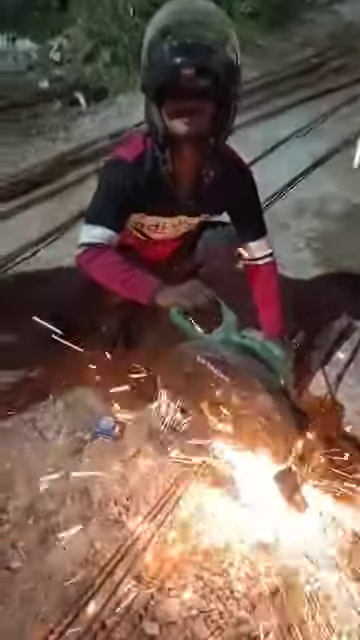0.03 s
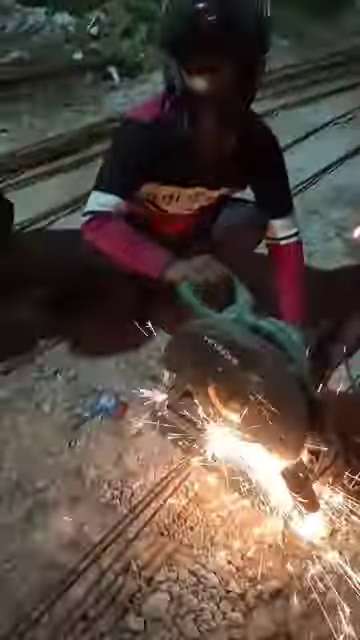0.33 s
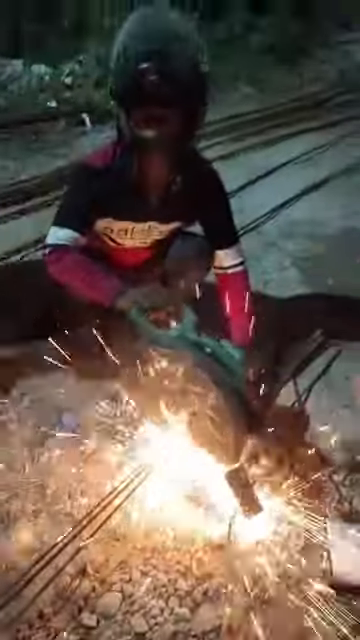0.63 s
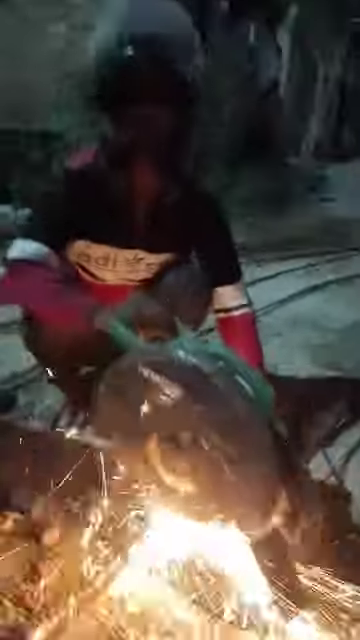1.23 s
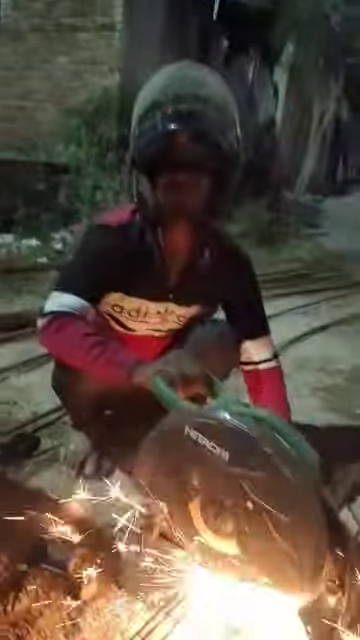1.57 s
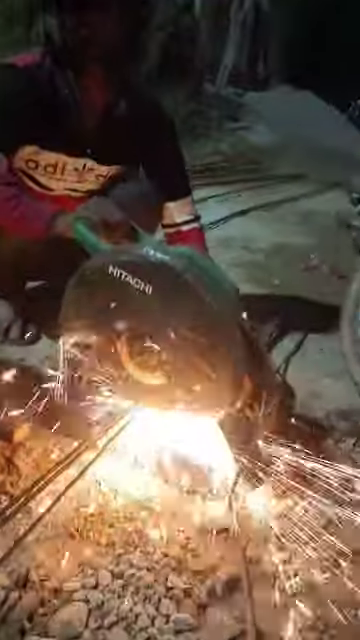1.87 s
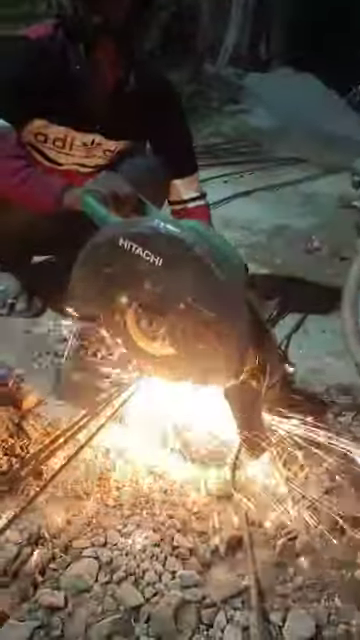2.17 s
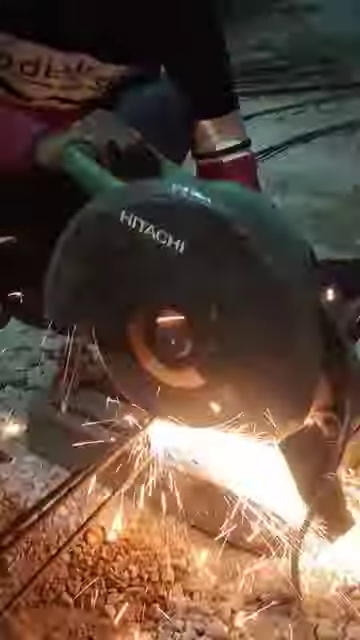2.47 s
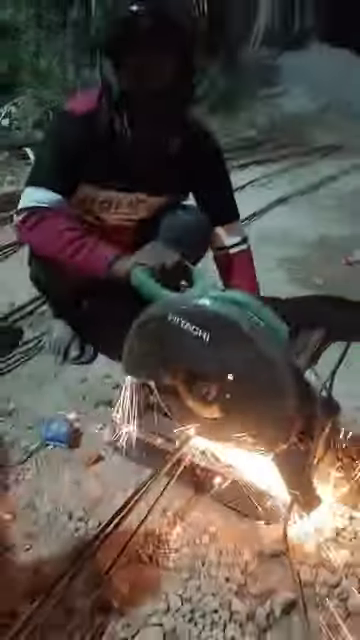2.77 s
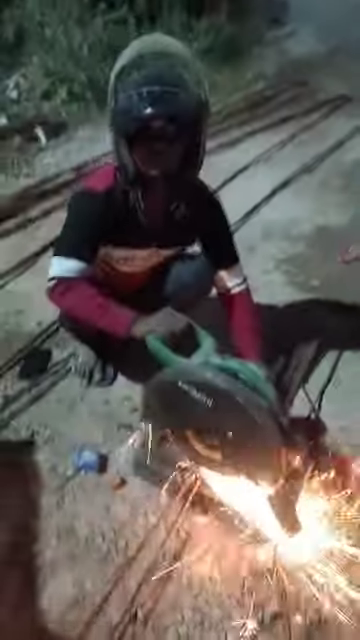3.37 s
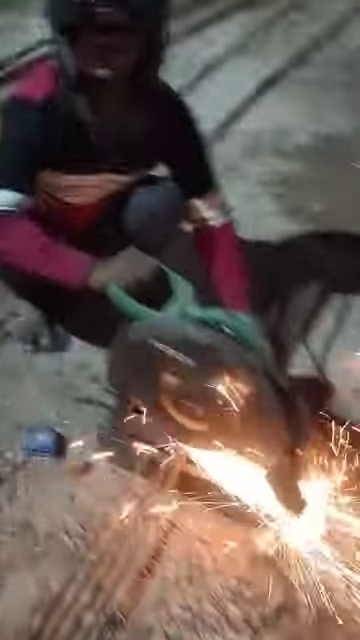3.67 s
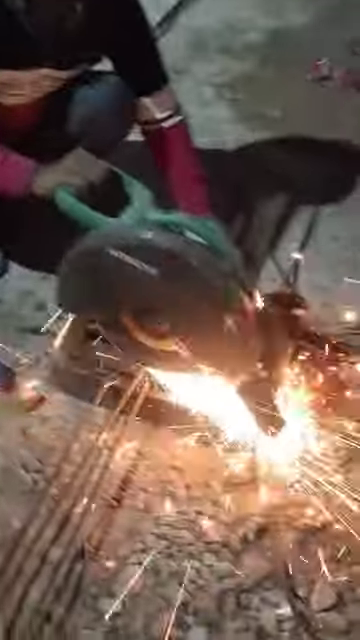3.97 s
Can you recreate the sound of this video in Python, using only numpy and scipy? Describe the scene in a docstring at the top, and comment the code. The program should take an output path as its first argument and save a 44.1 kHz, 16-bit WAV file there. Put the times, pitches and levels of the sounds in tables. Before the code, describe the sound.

Outdoors, a close cut-off saw bites into steel rods with a harsh rasp, metallic ringing and fizzing sparks. Air from the wheel rumbles on the microphone's left side, then the grinding lightens and the motor's whine comes forward.

```python
"""Outdoors, close by, an abrasive cut-off saw grinds through steel rods.
The wheel's grit scrapes the steel once a turn, the rods ring in one mode after another,
sparks tick, the wheel squeals and the geared motor whines. During the deep cut, air thrown off
the wheel buffets the left microphone port; the cut then eases to light skimming.
Twice the sound drops out briefly."""
import sys
import numpy as np
from scipy import signal
from scipy.fft import rfft, irfft, next_fast_len
from scipy.io import wavfile
from scipy.ndimage import uniform_filter1d, map_coordinates

SR = 44100
rng = np.random.default_rng(int(sys.argv[2]) if len(sys.argv) > 2 else 0)


def bounce(signal):
    """Save signal as a 16-bit WAV file at the path given by the first command-line argument."""
    frames = np.transpose(np.atleast_2d(signal))
    limited = np.clip(frames, -1, 1)
    pcm = np.round(limited * 32767).astype(np.int16)
    wavfile.write(sys.argv[1], SR, pcm)


N = 176400


def amp(db):
    """Decibels to gain."""
    return 10 ** (np.asarray(db) / 20)


def unit(x):
    """Scale to rms 1; a pair is scaled by its mid signal."""
    return x / np.sqrt(np.mean(np.atleast_2d(x).mean(0) ** 2) + 1e-20)


def along(points, hz):
    """Interpolate (Hz, value) points on a log axis."""
    knots_hz, values = np.transpose(points)
    return np.interp(np.log(hz + 1), np.log(knots_hz + 1), values)


def curves(rows):
    """One value per sample for each column after the time."""
    times_s, *columns = np.transpose(rows)
    return [np.interp(np.arange(N) / SR, times_s, column) for column in columns]


def wobble(knots_per_s):
    """Smooth random curve."""
    knots = rng.standard_normal(int(N * knots_per_s / SR) + 4)
    return map_coordinates(knots, [np.arange(N) * knots_per_s / SR])


def filtered(x, response):
    """Apply a frequency response."""
    size = next_fast_len(N + SR // 4)
    return irfft(rfft(x, size) * response(np.fft.rfftfreq(size, 1 / SR)), size)[..., :N]


def blend(a, b, share):
    """Equal-power mix with the given share of b."""
    share = np.clip(share, 0, 1)
    return np.sqrt(1 - share) * a + np.sqrt(share) * b


def panned(pair, pan_db):
    """Constant-power pan; pan_db is left minus right."""
    gains = amp(np.array([pan_db, -pan_db]) / 2).reshape(2, -1)
    return pair * gains / np.sqrt(np.mean(gains ** 2, 0))


LEFT_LEAD_S = .0001

def left_early(x):
    """Sound reaches the nearer, left port first."""
    return filtered(x, lambda hz: np.exp(1j * np.pi * LEFT_LEAD_S * np.outer([1, -1], hz)))


# Each row: frequency in Hz, left-right correlation.
PORT_CORRELATION = [(100, 0.75), (500, 0.84), (1200, 0.61), (2700, 0.26), (5000, 0.1), (12000, 0.13)]

def at_ports(pair):
    """Make two unrelated signals partly alike, the left a little early."""
    def mid_side_gains(hz):
        angle = np.arccos(np.clip(along(PORT_CORRELATION, hz), -1, 1)) / 2
        return np.array([np.cos(angle), np.sin(angle)])

    mid, side = filtered(pair, mid_side_gains)
    return left_early(np.array([mid + side, mid - side]))


# Each row: time in seconds, wheel speed in turns per second.
WHEEL_SPEED = [(0, 49.9), (.25, 51.2), (1, 52), (1.75, 49.8), (2.2, 50.7), (2.78, 53.55), (3.25, 54.42),
               (3.55, 54.72), (4, 55.2)]

def wheel_turns():
    """Running count of the wheel's turns."""
    return np.cumsum(curves(WHEEL_SPEED)[0]) / SR


# Each row: time in seconds, share of the scraping that repeats from turn to turn.
REPEAT_SHARE = [(0, 0.6), (.26, 0.7), (.38, 0.1), (2.6, 0.05), (2.8, 0.4), (4, 0.47)]

def scraping(turns, wear_turns, grains_per_turn=800):
    """The rim's grit comes round each turn and slowly wears; fresh fracture noise joins it."""
    grit = rng.standard_normal((2, 300, grains_per_turn))
    worn = signal.lfilter([1], [1, -np.exp(-1 / wear_turns)], grit, axis=1).reshape(2, -1)
    position = (turns + 40) * grains_per_turn  # 40 turns of run-in
    repeating = np.array([map_coordinates(rim, [position]) for rim in worn])
    fracture = rng.standard_normal((2, N))
    return at_ports(blend(unit(fracture), unit(repeating), curves(REPEAT_SHARE)[0]))


def wandering_contact(pair, patchy_db):
    """The contact point wanders, so narrow bands swell and fade at random."""
    spectrum = signal.stft(pair, nperseg=1024)[2]
    patches = rng.standard_normal(spectrum.shape[1:])
    for _ in range(2):
        patches = uniform_filter1d(patches, size=3, axis=0)
        patches = uniform_filter1d(patches, size=14, axis=1)
    spectrum *= amp(patchy_db * patches / patches.std())
    return unit(signal.istft(spectrum, nperseg=1024)[1][:, :N])


def runout(turns, depth, spot_turns, focus=1.5):
    """Gain of a wheel slightly out of true: it presses harder once a turn, at its heavy spot."""
    pressure = np.exp(focus * (np.cos(2 * np.pi * (turns - spot_turns)) - 1))
    gain = amp(depth * curves(REPEAT_SHARE)[0] * (pressure - pressure.mean()))
    return gain / np.sqrt(uniform_filter1d(gain ** 2, size=SR // 8))


# Each row: time in seconds, share of light skimming against deep cutting.
SKIM_SHARE = [(0, 0), (2.55, 0.34), (2.8, 0.99), (4, 1)]
# Each row: frequency in Hz, relative gain in dB.
DEEP_SPECTRUM = [(150, -21.5), (350, -18), (470, -9), (610, 0), (760, -10), (890, -7), (1020, -6),
                 (1130, -6), (1230, -13), (1370, -8), (1500, -12), (1880, -15.5), (2150, -13),
                 (2420, -14.5), (2700, -4.5), (3150, -2.5), (3450, -7.5), (3850, -8.5), (4250, -6),
                 (4500, -14), (4750, -10.5), (5100, -12), (5450, -3), (5800, -6.5), (6080, -10.5),
                 (6900, -10), (7700, -12), (8500, -8.5), (10200, -18), (12300, -30), (15400, -33.5)]
SKIM_SPECTRUM = [(60, -28), (150, -27), (250, -21), (380, -22), (460, -22), (580, -9.5), (700, -5.5),
                 (810, -6), (930, -2.5), (1050, -12), (1210, 2), (1500, -15.5), (1630, -17), (1820, -21.5),
                 (2250, 1.5), (2640, -0.5), (3100, -6), (3450, -5.5), (3750, -5.5), (4100, -17.5),
                 (4600, -8.5), (5000, -15), (5750, -10.5), (6200, -15.5), (7000, -12.5), (7600, -17),
                 (8500, -15.5), (9400, -19), (12000, -16), (15400, -27.5)]
# Five bands, low to high. Each row: time in seconds, relative level in dB, pan in dB.
ROAR_BAND = [(0.0, -30, 0.5), (0.72, -32, 2), (0.84, -31.5, 2.5), (1.44, -37, 2.5), (1.56, -32.5, 3),
             (1.62, -38, 1.9), (1.86, -35, -1), (1.92, -38, 0), (2.16, -36.5, 1), (2.22, -42, 2),
             (2.64, -38, 0), (3.36, -36.5, 1), (3.99, -35, 0.5)]
RASP_BAND = [(0.0, -19.5, 12), (0.36, -24, 3.8), (0.84, -21.5, 7.1), (0.9, -27, 4), (0.96, -22, 4.5),
             (1.08, -24, 1.85), (1.32, -33, 4.3), (1.44, -39.5, 1.2), (1.63, -43, 3.3), (1.74, -28.5, 8.7),
             (1.83, -41.5, 4.8), (2.04, -27.5, 7), (2.16, -26.5, 7), (2.22, -31.5, 10), (2.28, -24.5, 7.3),
             (2.4, -25, 6.9), (2.52, -31, 7.5), (2.58, -25.5, 8.3), (2.82, -25, 12), (2.88, -24, 7.1),
             (3.36, -26.5, 7), (3.48, -26.5, 9.2), (3.99, -21.5, 14)]
SIZZLE_BAND = [(0.0, -24, 7.7), (0.66, -27, 3.4), (1.02, -25.5, 4.0), (1.38, -31, 6.7), (1.62, -34, 5),
               (1.72, -25, 9.2), (1.86, -36.5, 7.8), (2.1, -30.1, 4), (2.16, -28, 6.8), (2.4, -25.5, 10),
               (2.46, -34, 11), (2.52, -30, 7.5), (2.82, -29, 9.9), (3.24, -30, 10.5), (3.48, -33.5, 9.2),
               (3.72, -31, 9.3), (3.99, -31.5, 6.5)]
HISS_BAND = [(0.0, -32, -5.5), (0.84, -31.5, -3), (1.14, -33, -8), (1.44, -41, -11), (1.8, -38, -7),
             (2.22, -33, -5), (2.46, -35.5, -7), (2.58, -32, -14), (2.7, -42, -4), (2.88, -46.5, -5),
             (3.36, -35.5, -3), (3.72, -40.5, -2), (3.99, -40, -4)]
FIZZ_BAND = [(0, -36, 10), (.3, -32, 4), (.6, -33, 3), (1.26, -38.5, 2), (1.4, -46, 2), (2.58, -42, 8),
             (2.66, -48, 10), (2.76, -39.5, 8), (3.06, -42, 5), (4, -41, 10)]

def grinding(turns, scrape):
    """Scraping coloured by wheel, guard and steel; the contact pressure chatters."""
    def jolts():
        return wobble(70) + 1.05 * wobble(21.94) + 0.29 * wobble(260)

    skim, = curves(SKIM_SHARE)
    shared_jolts = jolts()

    def band(rows, press, lo_hz, hi_hz, gain_db, chatter_db):
        def coloured(spectrum):
            edges = lambda hz: 1 / np.sqrt((1 + (lo_hz / (hz + 1)) ** 20) * (1 + (hz / hi_hz) ** 20))
            return unit(filtered(scrape, lambda hz: edges(hz) * amp(along(spectrum, hz))))

        level_db, pan_db = curves(rows)
        cut = blend(coloured(DEEP_SPECTRUM), coloured(SKIM_SPECTRUM), skim)
        chatter = unit(amp(chatter_db * blend(jolts(), shared_jolts, share=0.37)))
        return panned(cut, pan_db) * amp(level_db + gain_db) * chatter * press

    low_press = runout(turns, depth=4, spot_turns=0.62)
    high_press = runout(turns, depth=0.5, spot_turns=0.42)
    return (band(ROAR_BAND, low_press, lo_hz=74, hi_hz=1890, gain_db=3, chatter_db=1.2)
            + band(RASP_BAND, high_press, lo_hz=1770, hi_hz=3196, gain_db=-3.5, chatter_db=0.53)
            + band(SIZZLE_BAND, high_press, lo_hz=4030, hi_hz=6360, gain_db=-3, chatter_db=0.85)
            + band(HISS_BAND, high_press, lo_hz=7760, hi_hz=10200, gain_db=-3, chatter_db=1.24)
            + band(FIZZ_BAND, high_press, lo_hz=12540, hi_hz=19400, gain_db=-0.5, chatter_db=1.5))


# Each row: start in seconds, end in seconds, pitch in Hz, width in Hz, relative level in dB.
ROD_MODES = [(0, .3, 2930, 70, -30), (0, .3, 3180, 50, -31), (0, .2, 2720, 60, -31),
             (0, .25, 4270, 45, -36), (.68, 1.1, 2930, 60, -26.5), (.95, 1.27, 1135, 35, -37),
             (1.05, 1.38, 2740, 50, -32), (1.12, 1.45, 570, 50, -31), (1.28, 1.46, 2190, 50, -41),
             (1.35, 1.78, 3780, 90, -42), (1.38, 2.05, 4730, 100, -42), (1.6, 1.8, 4190, 35, -35.5),
             (1.57, 1.82, 2090, 45, -40), (1.65, 2.16, 553, 52, -28), (1.65, 1.82, 1148, 25, -34.5),
             (1.67, 1.78, 2720, 70, -34), (1.68, 1.85, 1745, 35, -38), (1.82, 2.05, 1330, 70, -39),
             (1.9, 2.42, 3110, 70, -35), (1.99, 2.19, 2730, 50, -31), (2.1, 2.3, 1110, 30, -37),
             (2.3, 2.56, 4350, 90, -37), (2.64, 3.02, 1506, 34, -36), (2.72, 3, 1607, 28, -37.5),
             (2.85, 3.65, 2520, 110, -31), (2.85, 3.15, 3030, 40, -33), (2.96, 3.32, 1138, 26, -28.5),
             (3.42, 3.85, 2690, 70, -29.5), (3.76, 4.1, 2990, 130, -29)]
# Low modes lock into a tone, high ones stay rough. Each row: pitch in Hz, share of pure tone.
MODE_PURITY = [(1600, .84), (2700, .25)]
# High modes radiate more to the left. Each row: pitch in Hz, pan in dB.
MODE_PAN = [(1400, 2.5), (2700, 12.5)]

def ringing_rods(turns, scrape, hold_s=0.015, fade_s=0.13, flutter_db=2.5, gain_db=1):
    """Friction drives mode after mode to a steady ring that pulses once and flutters twice a turn."""
    t, out = np.arange(N) / SR, np.zeros((2, N))
    drive = scrape * runout(turns, depth=6, spot_turns=0.41)
    flutter = amp(flutter_db * np.cos(2 * np.pi * 2 * turns))
    pulsing = runout(turns, depth=6, spot_turns=0.58) * flutter
    for start_s, end_s, hz, width_hz, level_db in ROD_MODES:
        gate = np.clip(np.minimum(t - start_s, end_s - t) / fade_s + .5, 0, 1)
        rough = signal.lfilter(*signal.iirpeak(hz, hz / width_hz, SR), drive)
        rough = signal.lfilter(*signal.iirpeak(hz, hz / (width_hz * 4), SR), rough)
        power = uniform_filter1d(np.mean(rough ** 2, 0), size=int(hold_s * SR))
        steady = rough / np.sqrt(np.abs(power) + 1e-12)
        phase = 2 * np.pi * np.cumsum(hz + 0.3008 * width_hz * wobble(40)) / SR
        tone = np.sqrt(2) * np.sin(phase + np.pi * hz * LEFT_LEAD_S * np.array([[1], [-1]]))
        ring = blend(steady, tone, along(MODE_PURITY, hz)) * pulsing
        out += unit(panned(ring, along(MODE_PAN, hz))) * gate * amp(level_db + gain_db)
    return out


def sparks(level_db, per_s=110, decay_s=.0012, spread_db=2):
    """Hot chips burst off the cut in tiny bright ticks; their level follows the hiss band."""
    onsets = rng.random(N) < per_s / SR
    bursts = onsets * amp(spread_db * np.clip(rng.standard_normal(N), -2, 2))
    envelope = signal.lfilter([1], [1, -np.exp(-1 / (decay_s * SR))], bursts)
    ticks = envelope * rng.standard_normal((2, N))
    bright = signal.sosfilt(signal.butter(2, 7500, 'high', fs=SR, output='sos'), ticks)
    hiss_db = curves(HISS_BAND)[0]
    return unit(bright) * amp(level_db + hiss_db - hiss_db[0])


# Each row: time in seconds, upper mode's pitch in Hz, relative levels of upper and lower mode in dB.
SQUEAL_MODES = [(0, 5720, -35, -39), (.4, 5700, -48, -48), (1.3, 5680, -42, -42), (1.5, 5560, -29, -46),
                (1.61, 5560, -43, -52), (1.68, 5690, -29.5, -50), (1.8, 5750, -36, -54),
                (1.97, 5840, -34, -52), (2.2, 5850, -46, -46), (2.65, 5750, -42, -48),
                (2.82, 5690, -31, -34), (3.08, 5650, -33, -39), (3.25, 5590, -30.5, -39),
                (3.5, 5600, -39, -35), (4, 5740, -39, -33)]

def squealing_wheel(turns, lower_order=97.4, scatter_hz=26, pan_db=10, gain_db=-0.5):
    """The wheel's flank rubs the cut and chirps once a turn; the lower pitch follows the speed."""
    def mode(hz, level_db, pulse):
        phase = 2 * np.pi * np.cumsum(hz + scatter_hz * wobble(250)) / SR
        ports = np.sin(phase + np.array([wobble(30), wobble(30)]))
        return unit(panned(ports, pan_db)) * pulse * amp(level_db + gain_db)

    upper_hz, upper_db, lower_db = curves(SQUEAL_MODES)
    lower_hz = lower_order * curves(WHEEL_SPEED)[0]
    return (mode(upper_hz, upper_db, runout(turns, depth=24, spot_turns=.62, focus=.7))
            + mode(lower_hz, lower_db, runout(turns, depth=38, spot_turns=.45, focus=.7)))


# Multiples of the wheel speed; the motor turns six times per wheel turn.
WHINE_ORDERS = [7, 13, 16, 17, 18, 22, 30, 42, 48]
# Each row: one order's relative level in dB when cutting deep, and when skimming.
ORDER_LEVELS = [(-43, -52), (-42, -41), (-52, -43), (-52, -39.5), (-38, -55), (-39, -38.5), (-58, -43.5),
                (-50, -29), (-56, -37)]
# Each row: time in seconds, gain in dB.
WHINE_GAIN = [(0, 1.5), (.25, 1), (.4, -11), (2.6, -12), (2.8, -7), (3.3, -4), (3.6, 0), (4, 1)]

def motor_whine(turns, jitter_turns=0.0011, flutter_db=0.5, pan_db=5):
    """Tones of wheel, gears and motor fan, locked to the wheel's turning."""
    angle = 2 * np.pi * (turns + jitter_turns * wobble(25))
    skim, = curves(SKIM_SHARE)
    tones = np.zeros(N)
    for order, (deep_db, skim_db) in zip(WHINE_ORDERS, ORDER_LEVELS):
        level_db = deep_db + (skim_db - deep_db) * skim - flutter_db * wobble(26)
        tones += amp(level_db) * np.sin(order * angle + rng.uniform(0, 2 * np.pi))
    return np.sqrt(2) * panned(left_early(tones), pan_db) * amp(curves(WHINE_GAIN)[0])


# Each row: time in seconds, level in dB.
BUFFET_LEVEL = [(0, -69), (.22, -42), (.26, -29), (.38, -23), (.44, -33), (.57, -25), (.7, -32.5),
                (.86, -28), (.93, -31.5), (1.29, -24.5), (1.65, -26), (1.7, -48), (1.8, -25.5), (2.04, -37),
                (2.1, -25), (2.15, -52), (2.19, -26.5), (2.28, -45), (2.34, -40), (2.39, -76), (2.44, -28),
                (2.48, -43), (2.51, -29.5), (2.63, -46.5), (2.77, -61), (4, -70)]
# Each row: frequency in Hz, relative gain in dB.
BUFFET_SPECTRUM = [(20, -14), (45, -11), (90, -4.5), (150, 1), (300, -2.5), (500, -8), (800, -21),
                   (1500, -66), (4000, -68)]

def buffeting_air(lump_db=3, gust_db=1, pan_db=17):
    """Eddies from the wheel thump on the ports, mostly the left one."""
    eddies = rng.standard_normal((2, N))
    eddies *= amp(lump_db * np.array([wobble(130), wobble(130)]) - gust_db * wobble(23.74))
    thumps = filtered(eddies, lambda hz: amp(along(BUFFET_SPECTRUM, hz)))
    return unit(panned(thumps, pan_db)) * amp(curves(BUFFET_LEVEL)[0])


def scene():
    """One wheel speed drives the grinding, the ringing, the squeal and the whine."""
    turns = wheel_turns()
    scrape = wandering_contact(scraping(turns, wear_turns=8.2), patchy_db=2.5)
    return (grinding(turns, scrape) + ringing_rods(turns, scraping(turns, wear_turns=5.4))
            + sparks(level_db=-40) + squealing_wheel(turns) + motor_whine(turns) + buffeting_air())


# Each row: start in seconds, end in seconds, recovery in seconds, depth in dB.
LEVEL_DIPS = [(2.2545, 2.2738, .0006, -23), (2.736, 2.751, .009, -33)]

def record(dry, fall_s=.0035, top_hz=15600):
    """Two brief dropouts, then the band limit."""
    t, dip_db = np.arange(N) / SR, np.zeros(N)
    for start_s, end_s, recovery_s, depth_db in LEVEL_DIPS:
        ramps = np.minimum((t - start_s) / fall_s, 1 - (t - end_s) / recovery_s)
        dip_db += depth_db * np.clip(ramps, 0, 1)
    return filtered(dry * amp(dip_db), lambda hz: hz < top_hz)


dry = scene()
out = record(dry)
bounce(out)
```